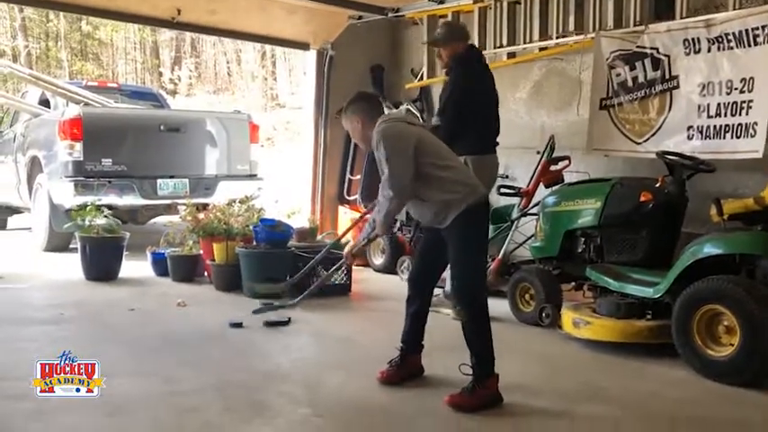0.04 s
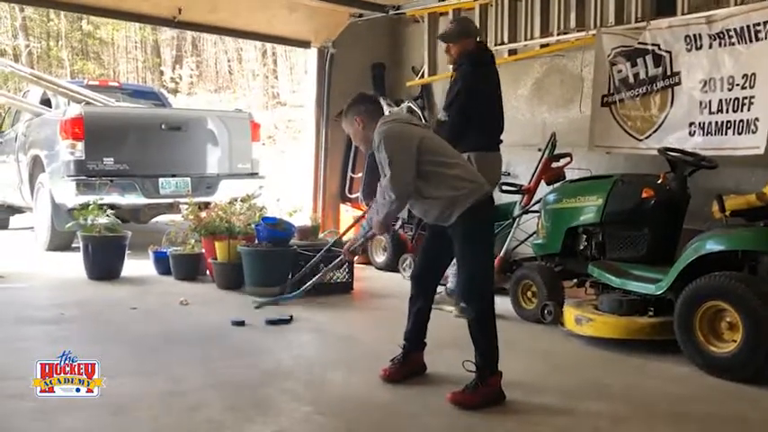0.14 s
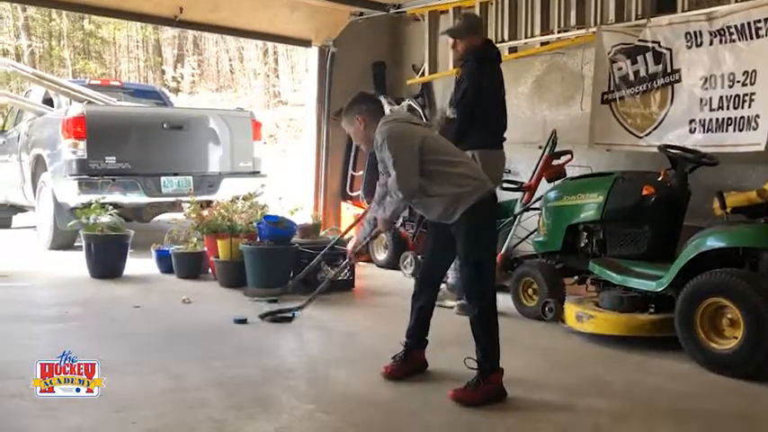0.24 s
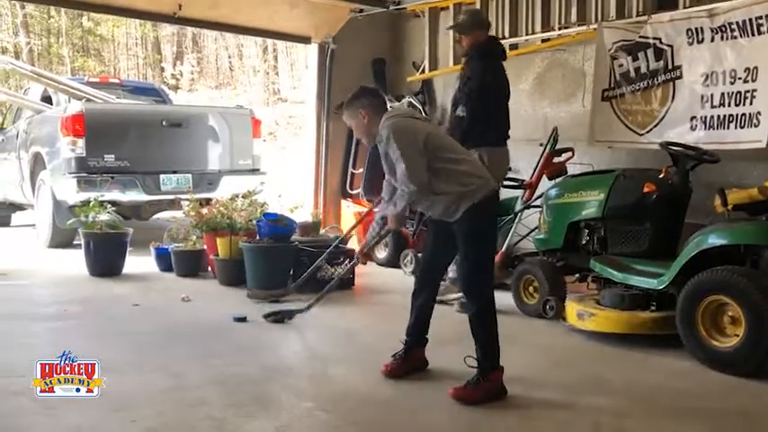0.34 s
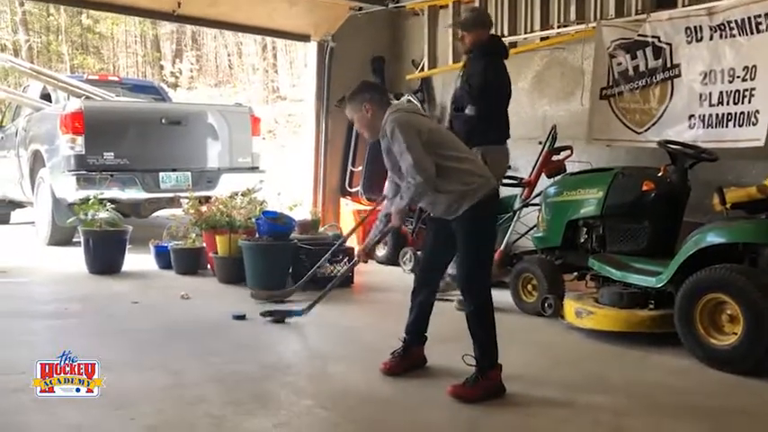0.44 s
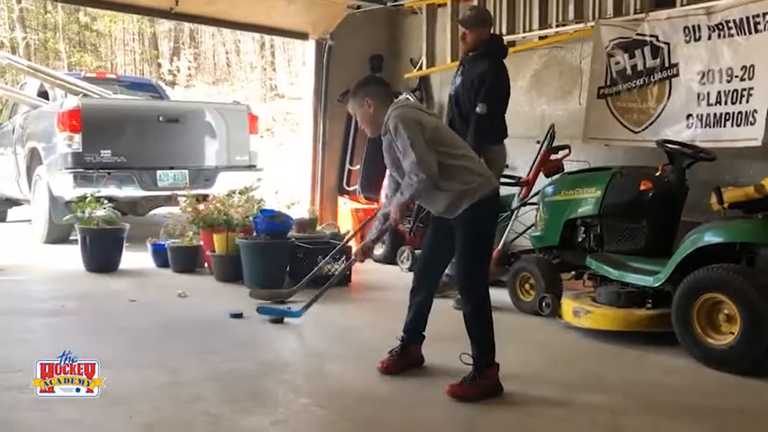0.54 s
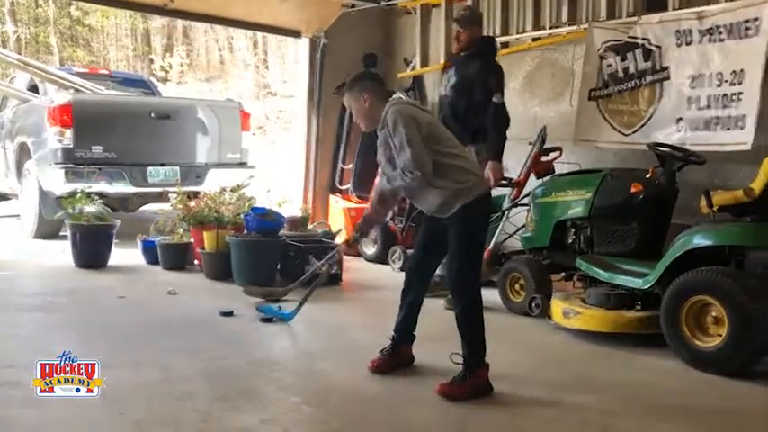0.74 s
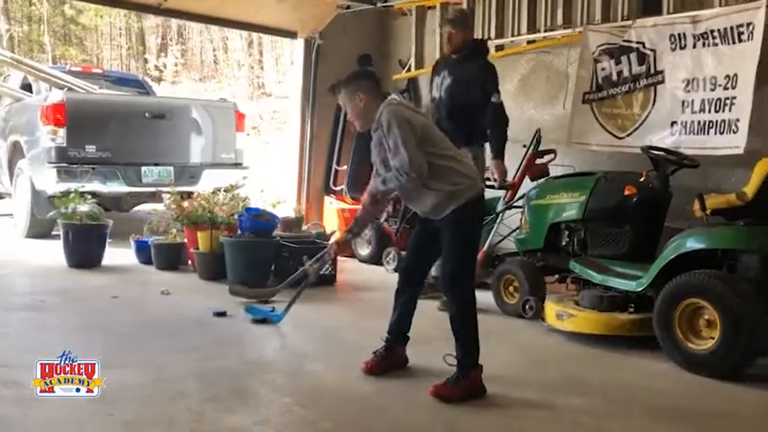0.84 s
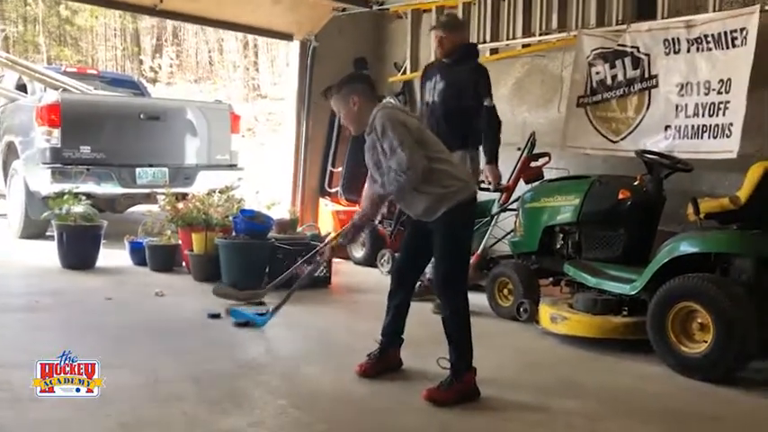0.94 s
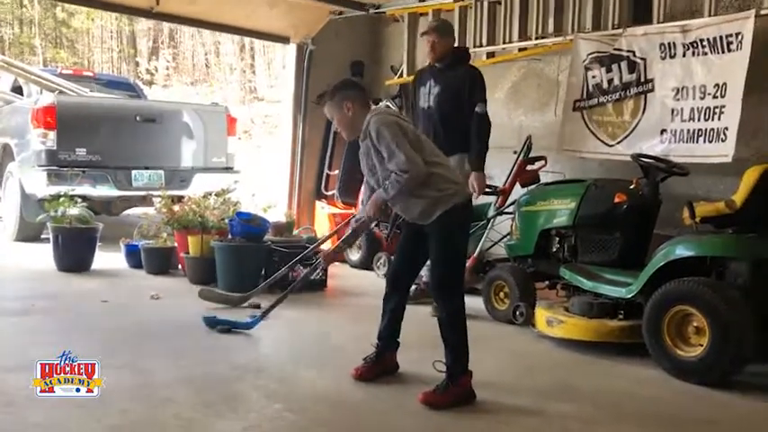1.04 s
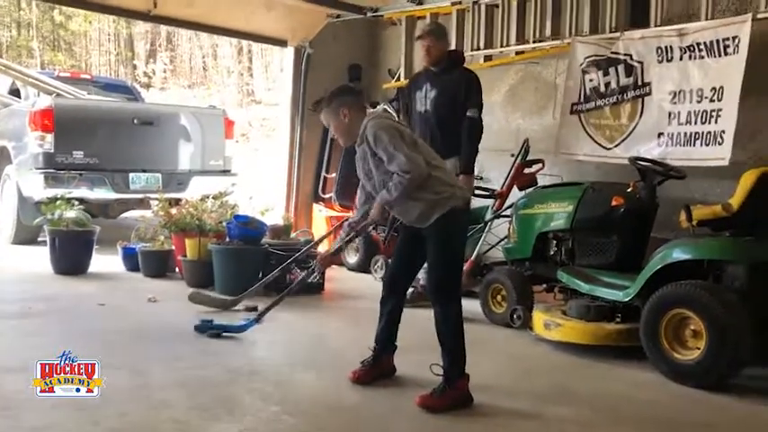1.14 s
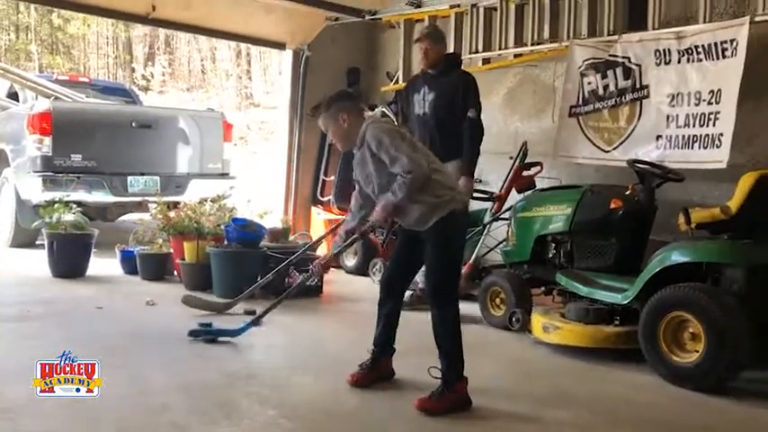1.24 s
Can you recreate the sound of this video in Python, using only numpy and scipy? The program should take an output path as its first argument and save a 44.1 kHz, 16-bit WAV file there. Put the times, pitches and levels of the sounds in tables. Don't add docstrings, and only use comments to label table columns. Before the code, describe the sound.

A hockey stick handles hard pucks on concrete. A fading wall tail of an earlier tap opens; at 0.23 s the blade slaps and bounces hard, a dull knock follows at 0.34, then gritty scraping with tiny squeaks until 0.55. A sharp puck clack lands at 0.65, a light tick at 0.87, quick triple tap at 1.09, then faint scraping and bright grit pops. Garage walls ring; quiet hum, phone-like pickup.

```python
import sys
import numpy as np
from scipy import signal
from scipy.fft import rfft, irfft, next_fast_len
from scipy.io import wavfile
from scipy.ndimage import uniform_filter1d

SR = 44100
rng = np.random.default_rng(int(sys.argv[2]) if len(sys.argv) > 2 else 0)


def pcm_store(signal):
    levels = np.round(np.clip(np.atleast_2d(signal), -1, 1) * 32767)
    wavfile.write(sys.argv[1], SR, levels.astype(np.int16).T)


def level_to_linear(level):
    exponent = np.asarray(level, float) / 20
    return 10 ** exponent


N = 57330
ROOM_DB = 4

# (frequency [Hz], level [dB], t60 [s])
TAP_MODES = [(1674, 0, .01), (2300, -3, .005), (3050, -5, .008), (3500, -8, .01), (4150, -3, .006),
             (5300, -20, .015), (11680, -22, .006)]
# (frequency [Hz], level [dB], t60 [s])
KNOCK_MODES = [(281, 1, 0.06), (586, -3, 0.071), (762, 9.5, 0.049), (917, 8, 0.025)]


def unit(x):
    return x / np.sqrt(np.mean(x ** 2) + 1e-20)


def along(points, hz):
    point_hz, value = np.transpose(points)
    return np.interp(np.log(hz + 1), np.log(point_hz + 1), value)


def filtered(x, response):
    size = next_fast_len(x.shape[-1] + 8192)
    spectrum = rfft(x, size) * response(np.fft.rfftfreq(size, 1 / SR))
    return irfft(spectrum, size)[..., :x.shape[-1]]


def shaped_noise(points):
    return unit(filtered(rng.standard_normal(N), lambda hz: level_to_linear(along(points, hz))))


def garage(x):
    # (frequency [Hz], t60 [s])
    decay = [(150, 0.4), (500, 0.94), (1500, 0.64), (4000, 0.47), (8000, 0.31), (15000, 0.35)]
    # (frequency [Hz], level [dB])
    colour = [(150, 7.5), (600, -2), (2000, -1.5), (5000, 4), (15000, 2.5)]
    first_wall_s, build_s = 0.0013, 0.005
    hz, t, z = signal.stft(rng.standard_normal(SR), SR, nperseg=256)
    fade_db = along(colour, hz)[:, None] - 60 * t / along(decay, hz)[:, None]
    tail = signal.istft(z * level_to_linear(fade_db), SR, nperseg=256)[1][:SR]
    late_s = np.maximum(np.arange(SR) / SR - first_wall_s, 0)
    tail = tail * (1 - np.exp(-late_s / build_s))
    return level_to_linear(ROOM_DB) * signal.fftconvolve(x * 1., tail / np.linalg.norm(tail))


def blows(contacts, modes, noise, ring_room_db):
    attack_s, scatter_db = 0.00034, 2.1
    crack_low_hz = 750
    lead = SR // 5
    out = np.zeros(N + lead + 2 * SR)
    t = np.arange(SR // 8) / SR
    rise = 1 - np.exp(-t / attack_s)

    def colour(hz):
        return level_to_linear(along(noise, hz))

    def small_body(hz):
        return (1j * hz / (crack_low_hz + 1j * hz)) ** 2

    for s, ring_db, crack_db, crack_t60_s, room_db in contacts:
        ring = np.zeros(len(t))
        for hz, mode_db, t60_s in modes:
            fade = level_to_linear(mode_db + scatter_db * rng.normal() - 60 * t / t60_s)
            ring += fade * np.sin(2 * np.pi * hz * t)
        ring = level_to_linear(ring_db) * ring * rise

        envelope = level_to_linear(crack_db - 60 * t / crack_t60_s) * rise
        crack = envelope * unit(filtered(rng.standard_normal(len(t)), colour))
        crack = filtered(crack, small_body)

        answer = filtered(garage(t == 0), colour)
        answer *= level_to_linear(ROOM_DB) * np.linalg.norm(envelope) / np.linalg.norm(answer)
        wet = level_to_linear(ring_room_db) * garage(ring) + answer

        at = round(s * SR) + lead
        out[at:at + len(t)] += ring + crack
        out[at:at + len(wet)] += level_to_linear(room_db) * wet
    return out[lead:lead + N]


def earlier_tap():
    # (time [s], ring level [dB], crack level [dB], crack t60 [s], room level [dB])
    contacts = [
        (-0.035, -25, -22.5, 0.011, 0),
    ]
    # (frequency [Hz], level [dB per Hz])
    noise = [(120, -27), (300, -17), (620, -4.5), (1000, -11), (1800, 0), (3200, -10), (5550, -22),
             (15700, -51)]
    return blows(contacts, TAP_MODES, noise, ring_room_db=-5)


def air():
    # (frequency [Hz], level [dB per Hz])
    hum = [(25, 2), (80, -2.5), (250, -1.5), (600, -31), (2000, -14.5), (5000, -29), (10000, -32.5),
           (16000, -42)]
    return level_to_linear(-54.5) * shaped_noise(hum)


def slap():
    # (time [s], ring level [dB], crack level [dB], crack t60 [s], room level [dB])
    contacts = [
        (.2309, -15.5, -12, 0.036, -0.5),
        (.2345, -20.5, -12, 0.017, -1),
        (.2382, -41, -12.5, 0.021, -2.5),
        (.2415, -42, -3.5, 0.0034, 6.5),
    ]
    # (frequency [Hz], level [dB], t60 [s])
    modes = [(828, 0, .05), (1103, -4, .05), (1340, -9, .04), (1900, -4, .05), (2400, -7, .04),
             (3050, -4, .04), (4080, -4, .03), (5740, -11, .025)]
    # (frequency [Hz], level [dB per Hz])
    noise = [(71, -57), (120, -30.5), (235, -16.5), (511, -21), (577, -10.5), (1390, -10.5), (2040, -5),
             (2220, -6), (15700, -26.5)]
    return blows(contacts, modes, noise, ring_room_db=-12)


def scrape():
    # (time [s], level [dB])
    pressure = [(.23, -100), (.36, -48), (.392, -32), (.402, -38.5), (.443, -38), (.45, -36.5), (.53, -42),
                (.545, -39), (.64, -55), (.77, -77), (.84, -51), (.9, -46), (1.0, -52), (1.082, -51.5),
                (1.13, -42.5), (1.18, -51.5), (1.215, -46.5), (1.3, -56)]
    # (frequency [Hz], level [dB])
    grit = [(300, -0.5), (1500, 6), (3500, 0.5), (6000, -5.5), (9000, -9.5), (13000, -11.5), (16000, -12.5)]
    grains_per_s, spread_db, hiss = 3600, 2.5, 0.95
    clumps = level_to_linear(2 * unit(uniform_filter1d(rng.standard_normal(N), size=200)))
    grains = (rng.random(N) < grains_per_s / SR) * rng.standard_normal(N)
    grains = grains * level_to_linear(spread_db * rng.exponential(size=N))
    rub = unit(clumps * (unit(grains) + hiss * rng.standard_normal(N)))
    rub = unit(filtered(rub, lambda hz: level_to_linear(along(grit, hz))))
    s, pressure_db = np.transpose(pressure)
    return level_to_linear(np.interp(np.arange(N) / SR, s, pressure_db)) * rub


def knocks():
    # (time [s], ring level [dB], crack level [dB], crack t60 [s], room level [dB])
    contacts = [
        (.339, -32, -24.5, 0.043, 1),
        (.545, -41, -44, 0.055, 6.2),
    ]
    # (frequency [Hz], level [dB per Hz])
    noise = [(80, -16), (150, -25), (300, -3.5), (700, 8.5), (1000, -3), (1600, -31), (3000, -6.5),
             (15700, -34.5)]
    return blows(contacts, KNOCK_MODES, noise, ring_room_db=-6)


def squeaks():
    # (time [s], length [s], frequency [Hz], level [dB], tilt [dB per overtone])
    chirps = [
        (.398, .014, 4500, -57, 0),
        (.448, .02, 3950, -54, -1),
        (.538, .016, 4030, -47, -1),
        (1.21, .009, 5150, -46, -12),
    ]
    partials, roughness = 4, .04
    out, t = np.zeros(N), np.arange(N) / SR
    drift = unit(uniform_filter1d(rng.standard_normal(N), size=60))
    for s, length_s, hz, level_db, tilt_db in chirps:
        phase_rad = 2 * np.pi * hz * np.cumsum(1 + roughness * drift) / SR
        tone = np.zeros(N)
        for k in range(partials):
            if (k + 1) * hz < SR / 2:
                tone += level_to_linear(k * tilt_db) * np.sin((k + 1) * phase_rad)
        swell = np.sqrt(np.sin(np.pi * np.clip((t - s) / length_s, 0, 1)).clip(0))
        out += level_to_linear(level_db) * tone * swell
    return out


def clacks():
    # (time [s], ring level [dB], crack level [dB], crack t60 [s], room level [dB])
    contacts = [
        (.6487, -17.5, -18, 0.0089, 0),
        (.6494, -10, -15, 0.018, 0),
    ]
    # (frequency [Hz], level [dB], t60 [s])
    modes = [(690, -17, .09), (1432, -2, .042), (1750, -2, .006), (2100, -5, .035), (2700, -6, .012),
             (3600, -5, .012), (4300, -13, .04), (5200, -15, .015), (9700, -30, .008)]
    # (frequency [Hz], level [dB per Hz])
    noise = [(120, -24.5), (680, -4.5), (1000, -7), (1500, -1), (2600, 0), (4500, -14), (7000, -23),
             (15700, -30)]
    return blows(contacts, modes, noise, ring_room_db=-5)


def ticks():
    # (time [s], ring level [dB], crack level [dB], crack t60 [s], room level [dB])
    contacts = [
        (.871, -25.5, -46, 0.0028, -8),
        (1.0075, -40, -44, .006, 0),
    ]
    # (frequency [Hz], level [dB], t60 [s])
    modes = [(1647, -9, .012), (4054, 0, .012), (5599, -1, .008), (7860, -6, .008), (9500, -8, .008)]
    # (frequency [Hz], level [dB per Hz])
    noise = [(500, -16), (2000, -8), (4000, -13), (6000, 4), (10000, -2), (15700, -14)]
    return blows(contacts, modes, noise, ring_room_db=-9)


def thuds():
    # (time [s], ring level [dB], crack level [dB], crack t60 [s], room level [dB])
    contacts = [
        (.8735, -42, -37, 0.035, 9.1),
        (1.093, -56.5, -37, 0.036, 3.6),
    ]
    # (frequency [Hz], level [dB per Hz])
    noise = [(80, -28), (150, -4), (300, 4.5), (700, 0), (1000, -22), (1800, 6.5), (3000, -11.5),
             (15700, -37)]
    return blows(contacts, KNOCK_MODES, noise, ring_room_db=-9)


def taps():
    # (time [s], ring level [dB], crack level [dB], crack t60 [s], room level [dB])
    contacts = [
        (1.0921, -16.5, -30, 0.0056, -3),
        (1.0966, -24, -30.5, 0.011, 0.5),
        (1.1022, -26, -45, 0.0054, -2),
    ]
    # (frequency [Hz], level [dB per Hz])
    noise = [(120, -28), (600, -14), (1000, -32), (1600, 5), (3000, -1), (4400, -17), (6500, -8),
             (15700, -17)]
    return blows(contacts, TAP_MODES, noise, ring_room_db=-3)


def flicks():
    # (time [s], level [dB])
    pops = [(1.121, -47), (1.126, -41), (1.13, -50), (1.1372, -37.5), (1.1625, -68), (1.199, -49),
            (1.207, -60), (1.212, -70), (1.216, -67)]
    centre_hz, width_hz, length_s = 12800, 2500, .0012
    t = np.arange(N) / SR
    gate = sum(level_to_linear(level_db) * np.exp(-((t - s) / length_s) ** 2) for s, level_db in pops)
    hiss = filtered(rng.standard_normal(N), lambda hz: np.exp(-((hz - centre_hz) / width_hz) ** 2))
    return gate * unit(hiss)


def scene():
    hits = earlier_tap() + slap() + knocks() + clacks() + ticks() + thuds() + taps()
    rub = scrape()
    chirps = squeaks() + flicks()
    room = garage(level_to_linear(-4) * rub + level_to_linear(-19) * chirps)[:N]
    return (hits + rub + chirps + room + air())[None]


def roll_off(x):
    return signal.sosfilt(signal.butter(12, 16820, fs=SR, output="sos"), x)


def record(dry):
    low_cut_hz, top_hz, top_slope_hz = 142, 15750, 40

    def band(hz):
        low_cut = (1j * hz / (low_cut_hz + 1j * hz)) ** 2
        return low_cut * (level_to_linear(-40) + .5 - .5 * np.tanh((hz - top_hz) / top_slope_hz))

    return roll_off(filtered(dry, band))


dry = scene()
out = record(dry)
pcm_store(out)
```